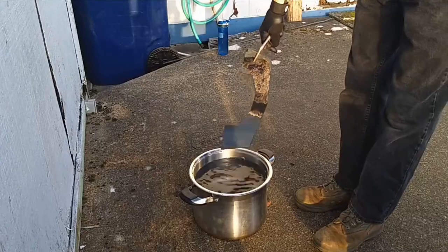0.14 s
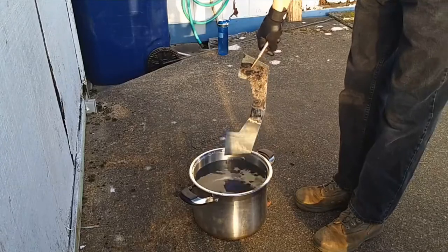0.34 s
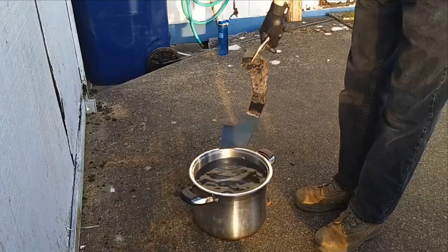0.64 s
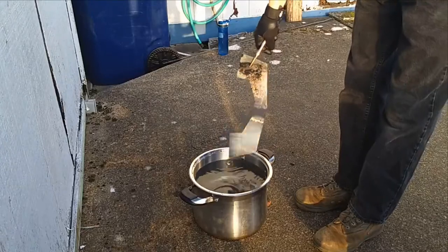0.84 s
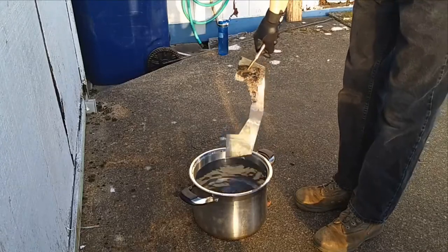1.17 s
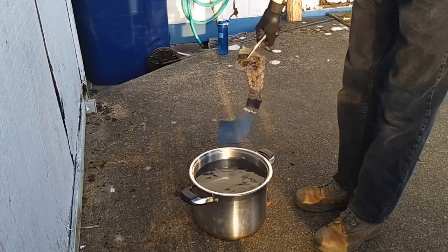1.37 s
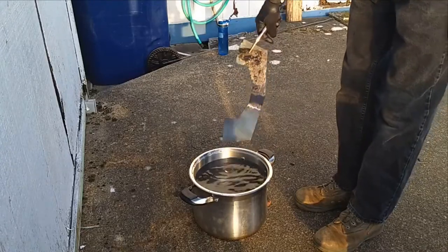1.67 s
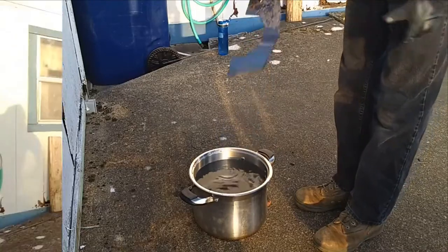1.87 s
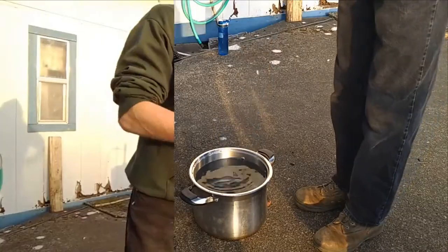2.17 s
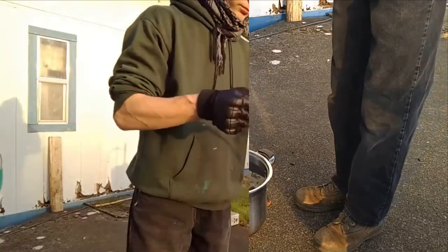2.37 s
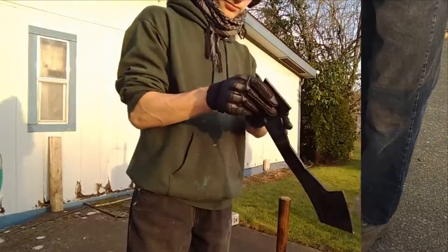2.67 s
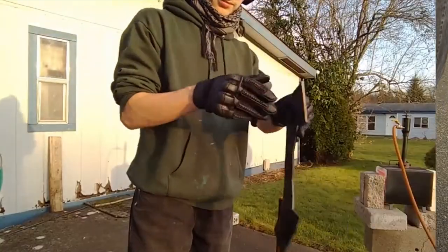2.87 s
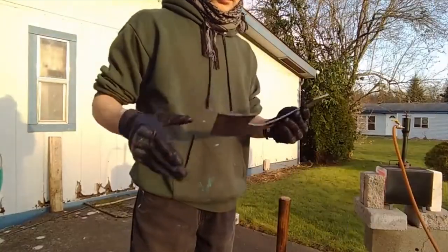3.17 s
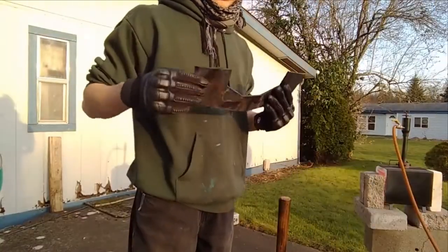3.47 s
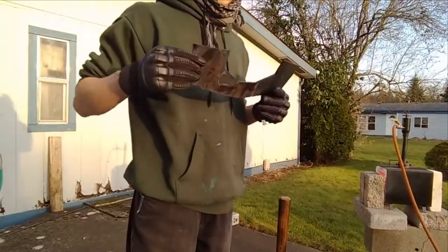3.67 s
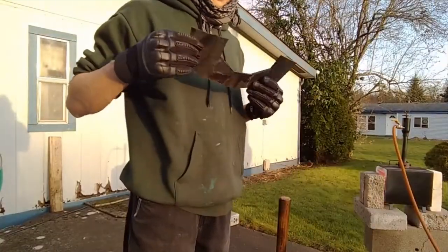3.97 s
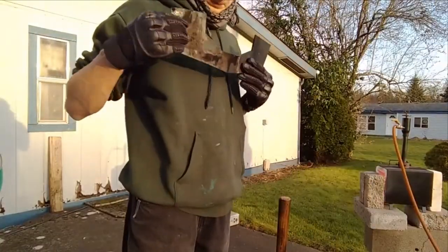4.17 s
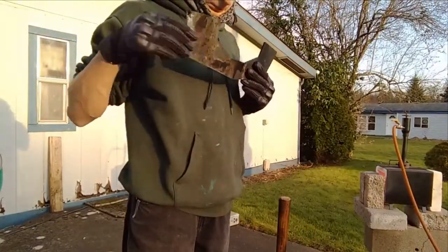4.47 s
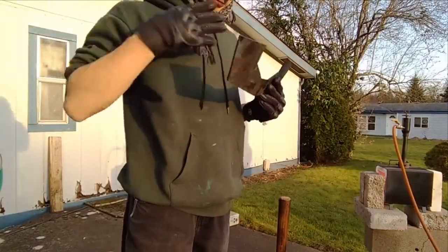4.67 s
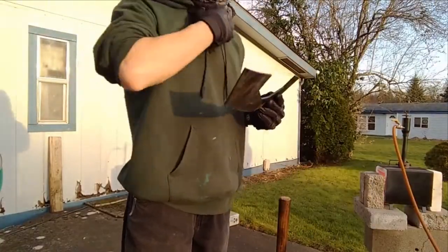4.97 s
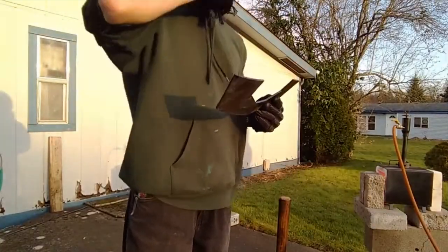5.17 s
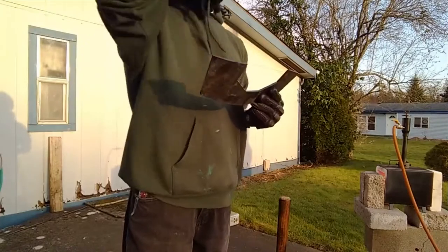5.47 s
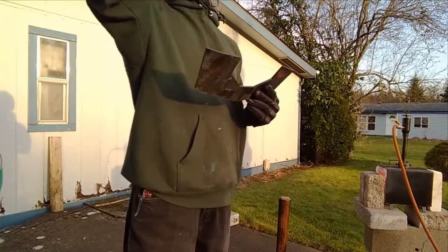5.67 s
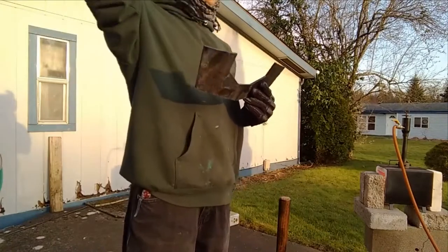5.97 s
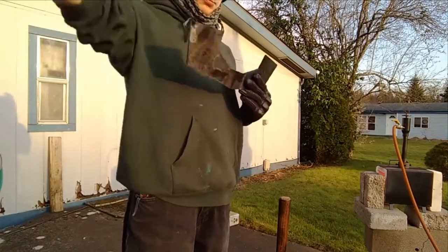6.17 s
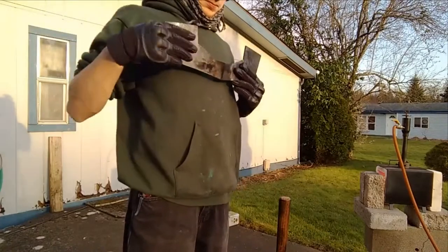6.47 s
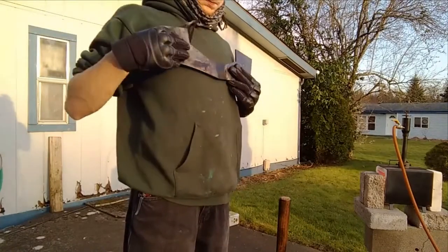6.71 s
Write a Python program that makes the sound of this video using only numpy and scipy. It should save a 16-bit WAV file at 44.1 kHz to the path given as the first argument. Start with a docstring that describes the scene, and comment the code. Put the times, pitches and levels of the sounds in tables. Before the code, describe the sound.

A gas forge burner roars steadily outdoors, a steel blade clinking once at the start, the roar swelling then dropping to a fluttering rush.

```python
"""Outdoors beside a propane forge, heard from a quench pot, then from beside the forge; the two overlap for
a second. Filtered noise rings the modes of the flame, its brick chamber and the burner tube, whose singing
modes glide and swell with the air in the mixture. Gas sizzles at fixed pitches; a valve whistles thinly.
A steel blade clinks as decaying sines under short scrapes; a tiny click ends the overlap, and later
comes a dull tap, a brief sine burst."""
import sys
import numpy as np
from scipy import signal
from scipy.fft import rfft, irfft
from scipy.io import wavfile
from scipy.ndimage import map_coordinates

SR = 44100
rng = np.random.default_rng(int(sys.argv[2]) if len(sys.argv) > 2 else 0)


def put_to_file(sound):
    """Save the sound as 16-bit audio at rate SR, in the file named by the first command-line argument."""
    columns = np.atleast_2d(sound).T  # one column per channel
    safe = np.clip(columns, -1, 1)
    whole_steps = np.round(safe * 32767)
    wavfile.write(sys.argv[1], SR, whole_steps.astype(np.int16))


N = 301644
TIME = np.arange(N) / SR  # s
FREQ = np.maximum(np.arange(N // 2 + 1) * SR / N, 1)  # Hz


def undb(db):
    """Decibels to gain."""
    return 10 ** (np.asarray(db) / 20)


def unit(x):
    """Scale to rms 1."""
    return x / np.sqrt(np.mean(x ** 2))


def curves(rows):
    """Columns of a timed table, interpolated to one value a sample."""
    time_s, *columns = np.transpose(rows)
    return [np.interp(TIME, time_s, column) for column in columns]


def walk(rate_hz):
    """Random wander that swings up to about `rate_hz` times a second; rms 1."""
    knots = rng.standard_normal(1024)
    return unit(np.interp(2 * rate_hz * TIME, np.arange(len(knots)), knots))


def swells(rows):
    """Rise in dB from a table of smooth swells, one value a sample."""
    shape = 3.6  # 2 is a bell, more is flatter on top
    total_db = 0
    for middle_s, length_s, rise_db in rows:
        distance = np.abs(2 * (TIME - middle_s) / length_s)  # 1 at half the rise
        total_db = total_db + rise_db * .5 ** (distance ** shape)
    return total_db


def noise(gain):
    """Turbulence as white noise with the given gain at each frequency; rms 1."""
    return unit(irfft(rfft(rng.standard_normal(N)) * gain, N))


def resonance(hz, width_hz):
    """Gain of a resonance with steep skirts."""
    return 1 / (1 + ((FREQ ** 2 - hz ** 2) / (FREQ * width_hz)) ** 2)


def ringing(modes, spot):
    """Turbulence ringing a set of modes, as it reaches one spot; rms 1."""
    power = 0
    for hz, width_hz, *level_db in modes:
        power = power + (undb(level_db[spot]) * resonance(hz, width_hz)) ** 2
    return noise(np.sqrt(power))


def blend(share, pot_db, forge_db):
    """Gain of a sound in the power blend of the two spots."""
    return np.sqrt((1 - share) * undb(pot_db) ** 2 + share * undb(forge_db) ** 2)


def mode(share, hz, width_hz, pot_db, forge_db):
    """Turbulence ringing one mode, at its level in the blend of the two spots."""
    return noise(resonance(hz, width_hz)) * blend(share, pot_db, forge_db)


def slide(x, ratio):
    """Resample at a changing rate: all resonances of a sound move together by the ratio."""
    return map_coordinates(x, [np.cumsum(ratio)], order=3, mode="wrap")


def click():
    """A one-sample impulse near the end of the overlap."""
    time_s, level_db = 2.9563, -22.5
    return undb(level_db) * (np.arange(N) == int(time_s * SR))


def valve(share):
    """Gas valve: two close, narrow modes whistle steadily at fixed pitch."""
    # valve modes: (frequency [Hz], width [Hz], level at pot [dB], level at forge [dB])
    whistles = [(3315, 16, -69, -71), (3342, 12, -60.5, -63.5)]
    return sum(mode(share, *row) for row in whistles)


def tap():
    """A soft, damped contact: a few cycles that swell and die at once."""
    # tap: (peak level [dB], frequency [Hz], rise time [s])
    level_db, hz, rise_s = (-30.5, 1480, .0015)
    start_s = 5.855
    t = np.maximum(TIME - start_s, 0)
    envelope = (t / rise_s * np.exp(1 - t / rise_s)) ** 2
    return np.sin(2 * np.pi * hz * t) * undb(level_db) * envelope


def knocks(scrape_db, scrape_t60_s):
    """Each blow gives a short scrape and rings the steel's modes, through its own contact low-pass."""
    # blows on the steel: (time [s], peak level [dB], contact low-pass [Hz])
    blows = [(0.0305, -31, 6200), (0.0317, -27.5, 4400), (0.038, -41, 4500), (.0440, -31, 2200),
             (0.155, -48, 5000)]
    # modes of the steel: (frequency [Hz], relative level [dB], t60 [s])
    steel_modes = [(1350, 3, 0.016), (1592, 4, .14), (2060, -5, 0.084), (2826, 0, 0.068), (3200, 4, .06),
                   (3203, -6, .09), (3430, 1, 0.047), (3700, -2, 0.05), (5360, 2, 0.039), (5680, 3, .06),
                   (5920, 8, 0.055), (6470, -6, .05), (7400, 3, 0.077), (7520, 4, .045)]
    t, out = TIME[:SR // 2], np.zeros(N + SR)
    band = signal.butter(4, [1300, 8000], "band", fs=SR, output="sos")
    for time_s, level_db, bright_hz in blows:
        signs = rng.choice([-1, 1], len(steel_modes))  # each blow lands on another part of the mode shapes
        ring = np.zeros(len(t))
        for sign, (hz, mode_db, t60_s) in zip(signs, steel_modes):
            decay = np.exp(-np.log(1000) * t / t60_s)
            ring += sign * undb(mode_db) * np.sin(2 * np.pi * hz * t) * decay
        scrape = signal.sosfilt(band, rng.standard_normal(len(t))) * undb(scrape_db)
        scrape *= np.exp(-np.log(1000) * t / scrape_t60_s)
        contact = signal.butter(2, min(bright_hz, SR / 3), fs=SR, output="sos")
        blow = signal.sosfilt(contact, ring + scrape)
        start = int(time_s * SR)
        out[start:start + len(t)] += undb(level_db) * blow / np.abs(blow).max()
    return out[:N]


def sizzle(share, level_db, flicker_db, flicker_hz):
    """The jet's own hiss, made before the gas mixes: its modes keep their pitch and flicker apart."""
    # gas jet modes: (frequency [Hz], width [Hz], relative level at pot [dB], relative level at forge [dB])
    jet_modes = [(7210, 420, -13.5, -9), (7720, 430, -6.5, -5), (8240, 400, -8.5, -9),
                 (8820, 480, -15, -11), (9560, 330, -27, -14.5), (10240, 720, -9, -9),
                 (10900, 650, -11.5, -12.5), (11600, 900, -13.5, -19.5), (12700, 800, -10, -9.5),
                 (13420, 550, -16, -13), (14150, 800, -16, -16), (15400, 1000, -12, -14.5)]
    return undb(level_db) * sum(mode(share, *row) * undb(flicker_db * walk(flicker_hz)) for row in jet_modes)


def singing(spot, air, waver_db, waver_hz):
    """Narrow tube modes rise and grow as the mixture leans, sink and fade as it chokes; the lowest flares."""
    # singing modes: (frequency [Hz], width [Hz], relative level at pot [dB], relative level at forge [dB],
    # level rise [dB per % excess air], relative pitch rise [1 per % excess air])
    tube_modes = [(3158, 116, -2.5, -4, 0.92, .017), (3802, 140, -7.5, -8, 1.14, .018),
                  (6333, 280, -5, -7.5, 0.6, .019)]
    # flares of the lowest mode, negative is a lull: (middle [s], length [s], rise [dB])
    flares = [(2.33, 0.3, 1.5), (3.04, .06, 4), (3.34, .22, 4), (4.01, .05, 5), (4.4, 0.22, -5),
              (4.73, .1, 2.5), (4.9, 0.11, 3), (5.26, 0.26, 3.5), (5.87, 0.067, 4.5), (6.14, 0.079, 3),
              (6.27, 0.13, -3), (6.55, 0.27, 3.5)]
    voices = []
    for hz, width_hz, *spot_db, db_per_air, bend in tube_modes:
        voice = slide(noise(resonance(hz, width_hz)), 1 + bend * air)
        level_db = spot_db[spot] + db_per_air * air + waver_db * walk(waver_hz)
        voices.append(voice * undb(level_db))
    return voices[0] * undb(swells(flares)) + sum(voices[1:])


def burner_tube(share, airs, hiss_db, roar_db, flicker_db, flicker_hz):
    """The gas jet rings the tube: broad modes hold pitch and flicker apart, others glide with the mixture."""
    # broad tube modes: (frequency [Hz], width [Hz], relative level at pot [dB], relative level at forge [dB])
    broad_modes = [(2250, 370, -18.5, -40), (2742, 550, -13.5, -14), (3350, 480, -14.5, -11),
                   (3880, 430, -13, -10.5), (4230, 300, -20.5, -30), (4476, 160, -25, -17.5),
                   (5244, 310, -13.5, -14), (5740, 430, -11, -8), (6390, 300, -17.5, -8.5),
                   (6700, 300, -27, -23)]
    # low gliding mode: (frequency [Hz], width [Hz], level at pot [dB re roar], level at forge [dB re roar])
    hoot_hz, hoot_width_hz, hoot_pot_db, hoot_forge_db = (1517, 50, -32.5, -26.5)
    hoot_bend = .009  # relative pitch rise per % excess air
    broad = sum(mode(share, *row) * undb(flicker_db * walk(flicker_hz)) for row in broad_modes)
    song = sum(np.sqrt(power) * singing(spot, airs[spot], waver_db=1.75, waver_hz=15)
               for spot, power in enumerate([1 - share, share]))
    air = (1 - share) * airs[0] + share * airs[1]
    hoot = slide(noise(resonance(hoot_hz, hoot_width_hz)), 1 + hoot_bend * air)
    hoot = hoot * blend(share, hoot_pot_db, hoot_forge_db) * undb(roar_db)
    return (broad + song) * undb(hiss_db) + hoot


def flame(spot, rumble_db, roar_db, rush_db, flutter_db, flutter_hz):
    """Unsteady combustion rumbles, rings the brick chamber and rushes out of its mouth."""
    # deep flame modes: (frequency [Hz], width [Hz], relative level at pot [dB], relative level at forge [dB])
    rumble_modes = [(75.5, 28.7, -0.5, -5.5), (121, 41.5, 1, -3), (145.1, 25, 1, -6)]
    # chamber modes: (frequency [Hz], width [Hz], relative level at pot [dB], relative level at forge [dB])
    chamber_modes = [(242.6, 43.7, -3.5, -1.5), (305.1, 43.6, -4, -2), (360.6, 30, -5.5, -7),
                     (434, 77, -2, -8.5), (491, 83, -1.5, -0.5), (563.7, 62, -1.5, -2.5),
                     (610, 65, -8.5, -3.5), (763, 38, -16, -12.5)]
    # mouth turbulence: (frequency [Hz], relative density at pot [dB per Hz], same at forge [dB per Hz])
    rush_colour = [(352, 5, -7.5), (647, -1.5, -6), (883, 3.5, 1), (1062, 0, -7), (1180, -4.5, -10),
                   (1454, -8.5, -11.5), (1705, -12, -19), (2020, -23, -27), (2350, -28, -40),
                   (4200, -60, -50)]
    flutter = undb(flutter_db * walk(flutter_hz))
    hz, *colour_db = np.transpose(rush_colour)
    rush_gain = undb(np.interp(np.log(FREQ), np.log(hz), colour_db[spot]))
    rush = noise(rush_gain / (1 + (FREQ / 3600) ** 8))
    rumble = ringing(rumble_modes, spot) * undb(rumble_db)
    roar = unit(ringing(chamber_modes, spot) * flutter) * undb(roar_db)
    return rumble + roar + unit(rush * flutter ** 1.05) * undb(rush_db + 1.3)


def hollow(x, share, leak_db, leak_waver_db, leak_hz):
    """Notches hollow the burner's spectrum; their depth wanders at random."""
    # burner notches, positive lifts: (frequency [Hz], width [Hz], gain at pot [dB], gain at forge [dB])
    notches = [(2351, 333, -2.5, -27.5), (4660, 340, -25, -8), (4800, 160, -4, -9), (6630, 160, -7, -4),
               (6930, 190, 2, -8), (9250, 260, -2, -3), (9560, 200, -5, 2)]
    spectrum = rfft(x)
    filtered = []
    for spot in range(2):
        dip_db = sum(gain_db[spot] / (1 + (2 * (FREQ - hz) / width_hz) ** 6) for hz, width_hz, *gain_db in notches)
        filtered.append(irfft(spectrum * undb(dip_db), N))
    pot, forge = filtered
    leak = np.minimum(undb(leak_db + leak_waver_db * walk(leak_hz)), 1)  # unfiltered share
    return leak * x + (1 - leak) * ((1 - share) * pot + share * forge)


def scene():
    """Surges drive the flame, spurts the jet, both shift the mixture; two spots blend; valve, steel, tap add."""
    # spot overlap: (time [s], power share of the forge spot [0-1])
    overlap = [(1.75, 0), (2.15, 0.32), (2.955, 0.3), (2.965, 1)]
    # fire between surges: (time [s], roar level [dB], rumble level [dB], rush level before flame's trim [dB])
    fire_levels = [(0, -29, -32.5, -44.5), (.5, -30, -32.5, -44), (1.2, -28, -31, -44.5),
                   (2.05, -23, -31.5, -41), (2.45, -26, -29.5, -37.5), (2.95, -22, -27, -37),
                   (3.0, -34.5, -33, -42), (4.5, -33, -31.5, -40.5), (6.84, -34.5, -33, -42)]
    # gas between spurts: (time [s], hiss level [dB], sizzle level [dB])
    gas_levels = [(0, -50, -56.5), (.45, -51.5, -55), (1.05, -51, -58), (1.65, -50.5, -55),
                  (2.0, -46.5, -53.5), (2.35, -47.5, -54), (2.95, -48.5, -53.5), (3.0, -53.5, -60),
                  (4.0, -53.5, -60), (5.4, -53.5, -59), (6.84, -52, -59)]
    # flame surges, negative is a falter: (middle [s], length [s], rise [dB])
    surges = [(.08, 0.03105, 4.5), (.27, 0.1205, 5.5), (.72, 0.066, 3), (1.61, 0.063, -6),
              (2.86, 0.045, 1.5), (3.17, 0.12, 8), (3.54, 0.076, 8), (3.81, 0.29, 8.5), (4.08, 0.17, 5),
              (4.36, .14, 6.5), (4.58, 0.089, 5.5), (4.69, 0.057, 5), (5.05, 0.14, 4.5), (5.45, 0.047, 3.5),
              (5.8, 0.12, 7), (6.3, 0.22, 8.5), (6.58, 0.038, 5)]
    # gas jet spurts, negative is a lull: (middle [s], length [s], rise [dB])
    spurts = [(1.45, 0.059, 2.5), (3.33, 0.17, 3), (3.56, 0.057, 5), (4.37, 0.11, 2), (4.75, 0.205, 2),
              (5.16, 0.054, 4), (5.3, 0.1066, 2), (5.52, .15, 7), (5.98, 0.099, -3), (6.57, 0.17, 1.5)]
    # slow mixture drift of the first burner sound: (time [s], excess air [%])
    first_air = [(0, -1.56), (.5, -1.1), (.9, -1.84), (1.35, -2.5), (1.6, -3), (1.95, -3.1), (2.3, -2.5),
                 (2.95, -3)]
    # slow mixture drift of the second burner sound: (time [s], excess air [%])
    second_air = [(2.1, -.3), (2.38, .4), (2.65, -.6), (3.05, -1), (3.3, -.1), (3.7, .3), (4.2, .2),
                  (4.75, -.7), (4.9, 0), (5.35, -.3), (5.52, .4), (5.9, .2), (6.4, -.4), (6.67, .8),
                  (6.84, -1.3)]
    rumble_follow, rush_follow = 0.22, 0.094  # dB per dB of surge
    hiss_follow, sizzle_follow = 0.73, 0.76  # dB per dB of spurt
    unrest_db, unrest_hz = 0.33, 18.2  # random wander of the surge level
    choke_per_db, draw_per_db = 0.29, 0.13  # % air lost per dB of surge, drawn in per dB of spurt
    draught_percent, draught_hz = 0.22, 9  # random wander of the mixture

    share = np.clip(curves(overlap)[0], 0, 1)
    roar_db, rumble_db, rush_db = curves(fire_levels)
    hiss_db, sizzle_db = curves(gas_levels)
    surge_db = swells(surges) + unrest_db * walk(unrest_hz)
    spurt_db = swells(spurts)
    air_swing = draw_per_db * spurt_db - choke_per_db * surge_db + draught_percent * walk(draught_hz)
    airs = [curves(drift)[0] + air_swing for drift in (first_air, second_air)]

    roar_db = roar_db + surge_db
    rumble_db = rumble_db + rumble_follow * surge_db
    rush_db = rush_db + rush_follow * surge_db
    jet = sizzle(share, sizzle_db + sizzle_follow * spurt_db, flicker_db=2.0, flicker_hz=12)
    tube = burner_tube(share, airs, hiss_db + hiss_follow * spurt_db, roar_db, flicker_db=2.5, flicker_hz=11)
    fire = sum(np.sqrt(power) * flame(spot, rumble_db, roar_db, rush_db, flutter_db=0.8, flutter_hz=35.26)
               for spot, power in enumerate([1 - share, share]))
    burner = hollow(fire + tube + jet, share, leak_db=-25, leak_waver_db=7.5, leak_hz=9.8)
    steel = knocks(scrape_db=7, scrape_t60_s=0.021)
    return (burner + valve(share) + steel + tap() + click())[None]


def record(dry):
    """The microphone loses the deepest bass and the very top."""
    low_cut = signal.butter(3, 42, "high", fs=SR, output="sos")
    top_cut = signal.ellip(10, .2, 80, 15750, fs=SR, output="sos")  # ripple dB, stopband dB, edge Hz
    return signal.sosfilt(top_cut, signal.sosfilt(low_cut, dry))


dry = scene()
out = record(dry)
put_to_file(out)
```